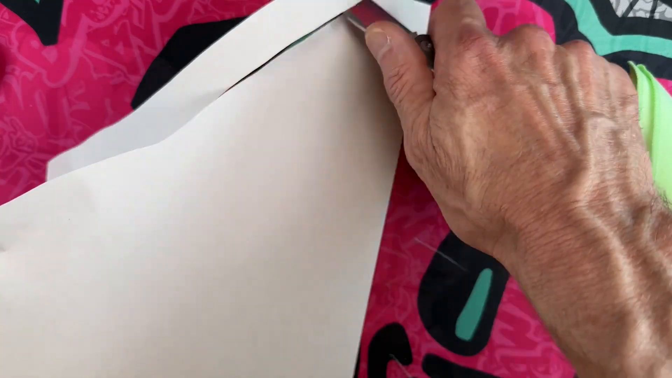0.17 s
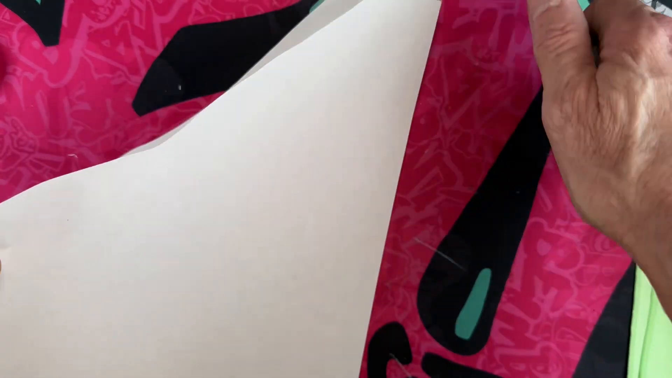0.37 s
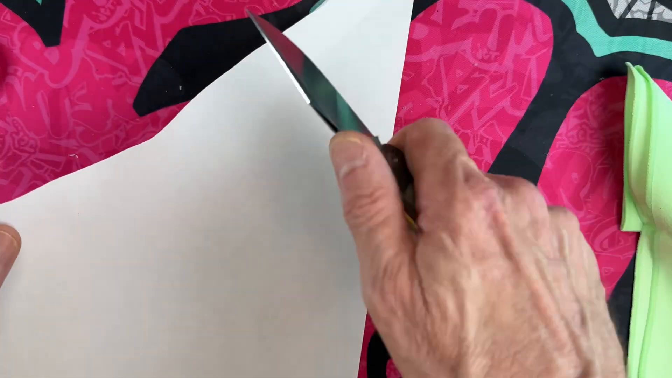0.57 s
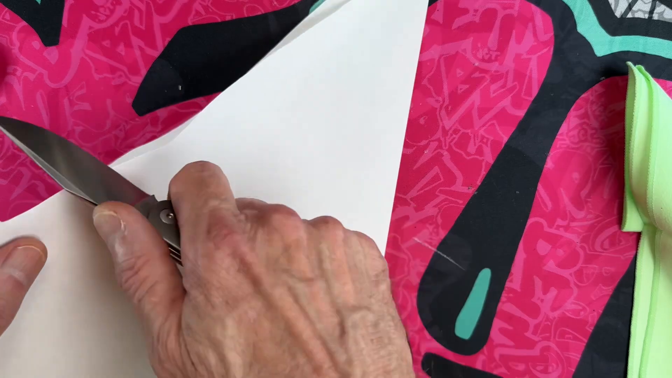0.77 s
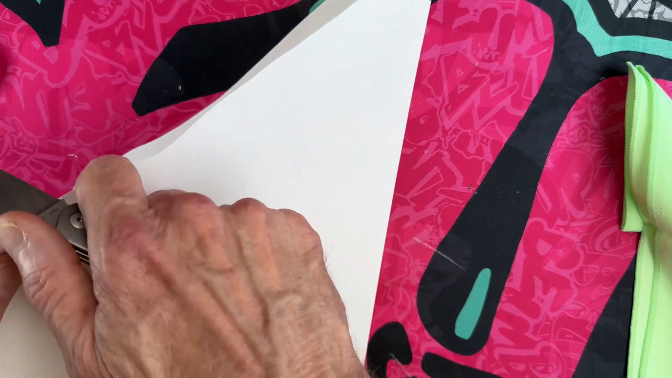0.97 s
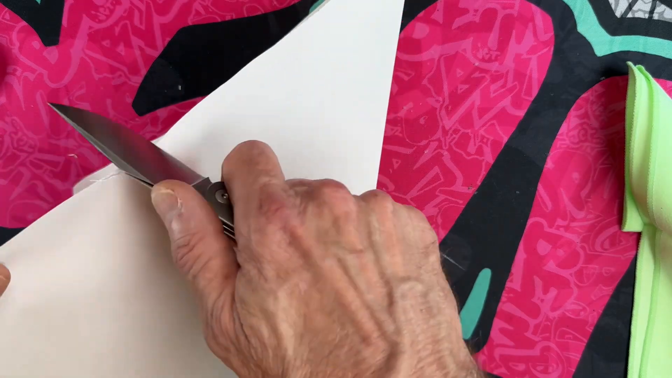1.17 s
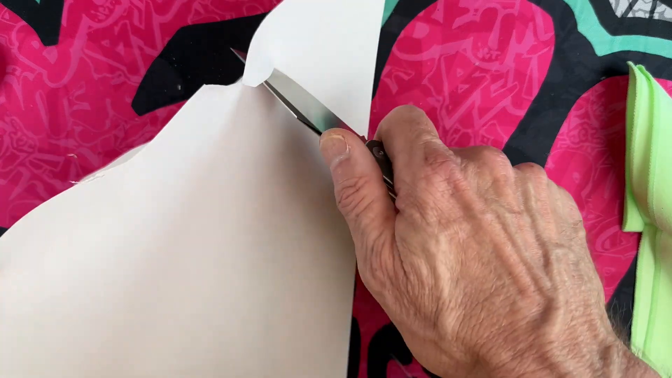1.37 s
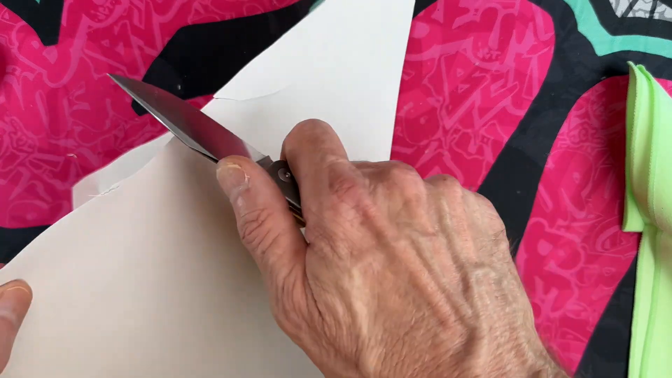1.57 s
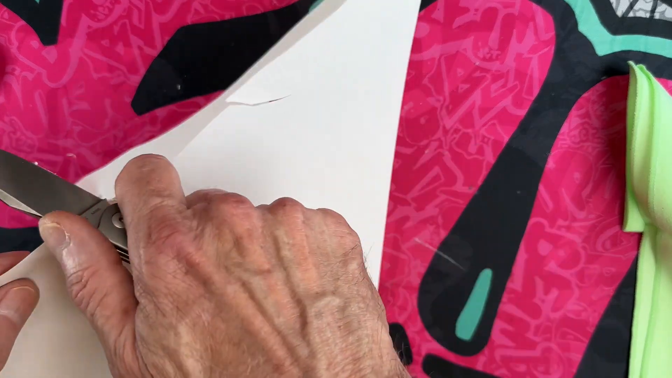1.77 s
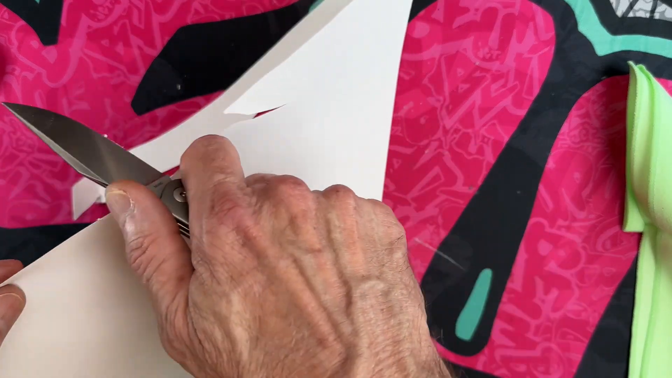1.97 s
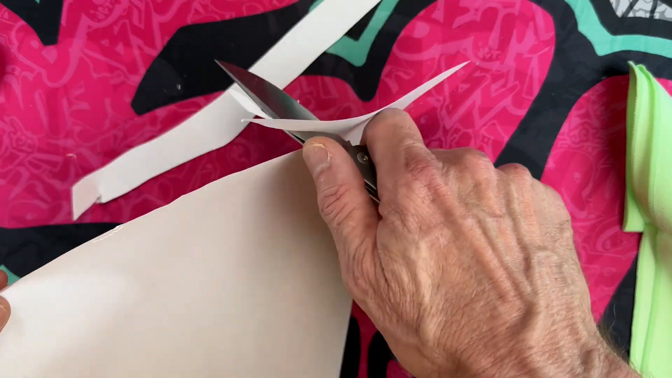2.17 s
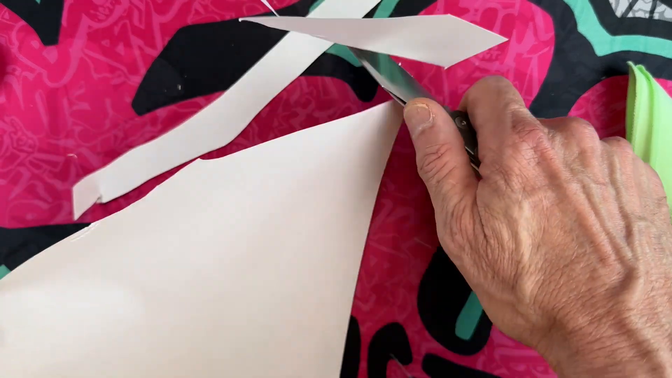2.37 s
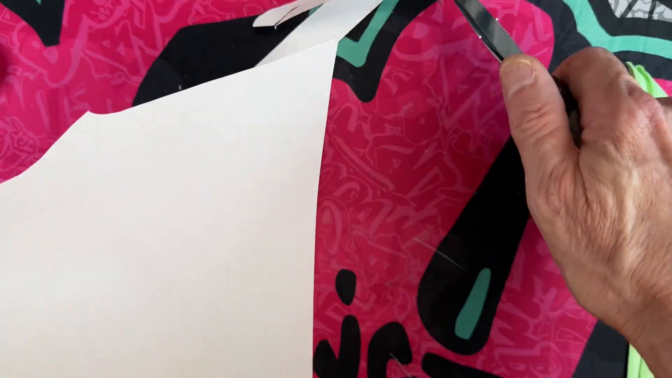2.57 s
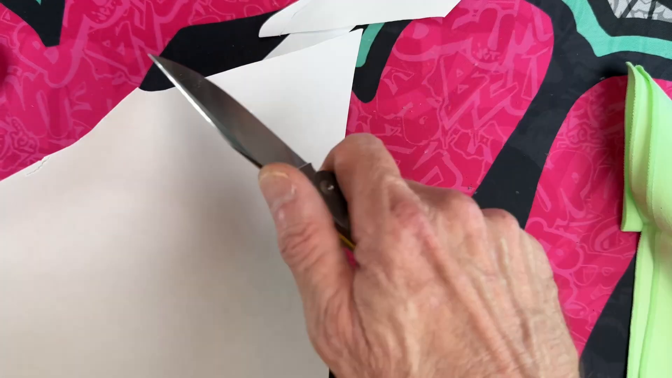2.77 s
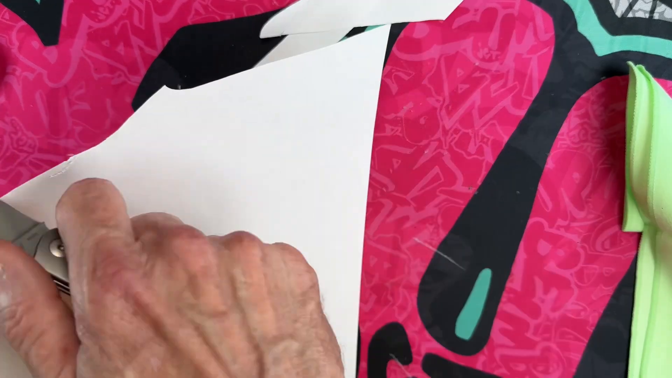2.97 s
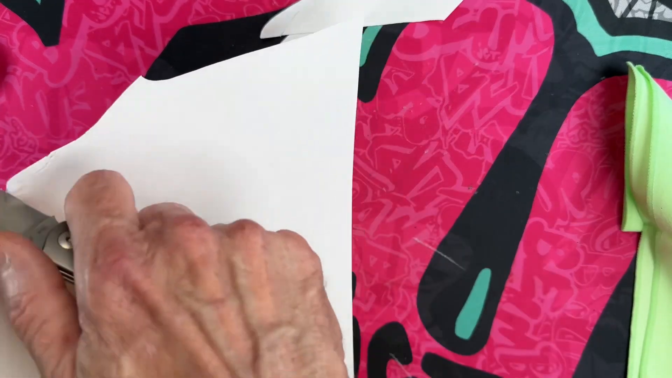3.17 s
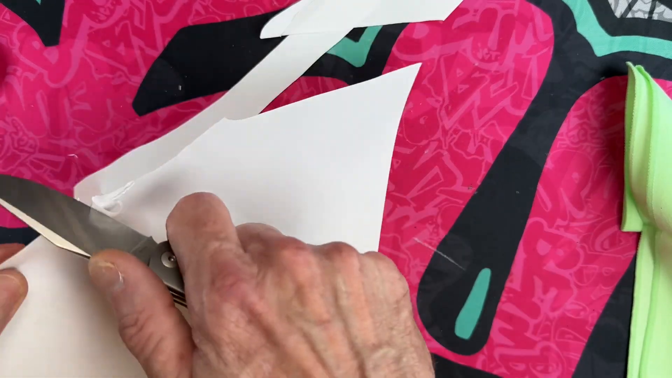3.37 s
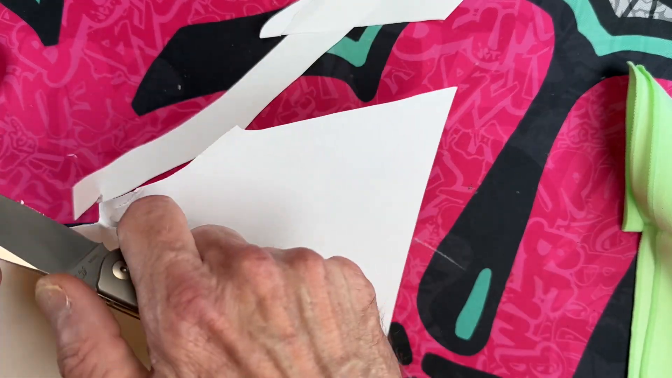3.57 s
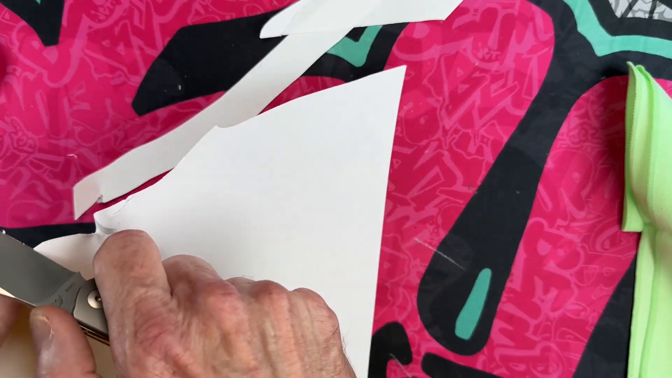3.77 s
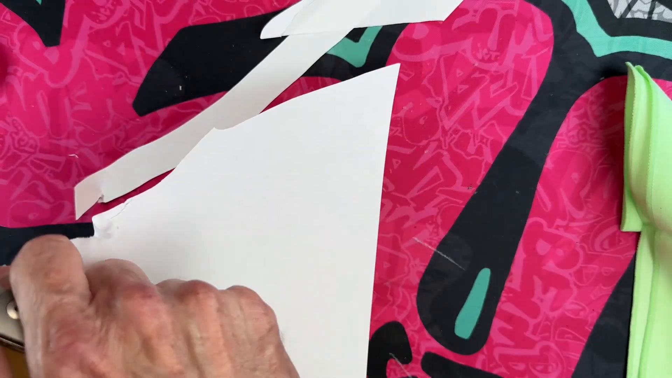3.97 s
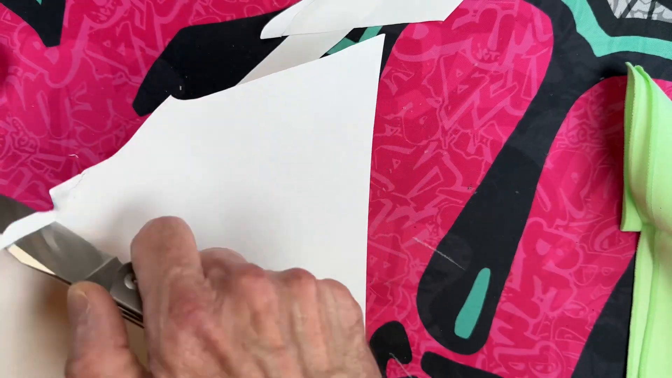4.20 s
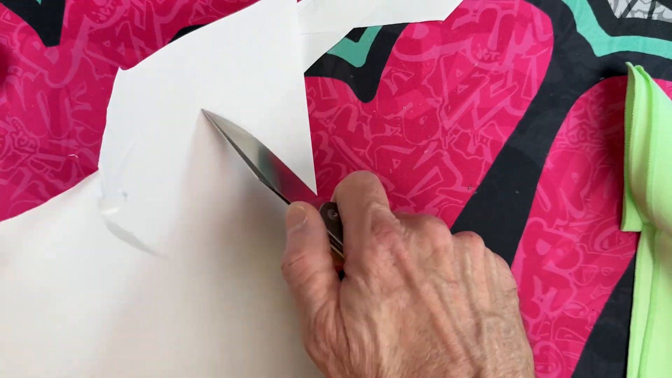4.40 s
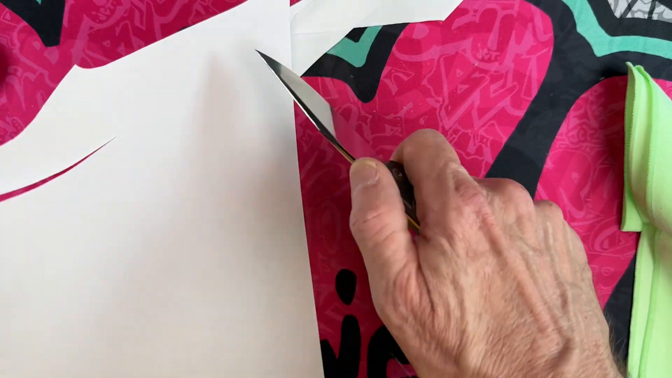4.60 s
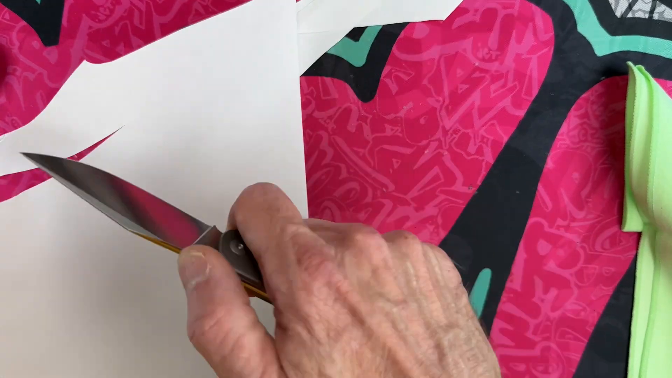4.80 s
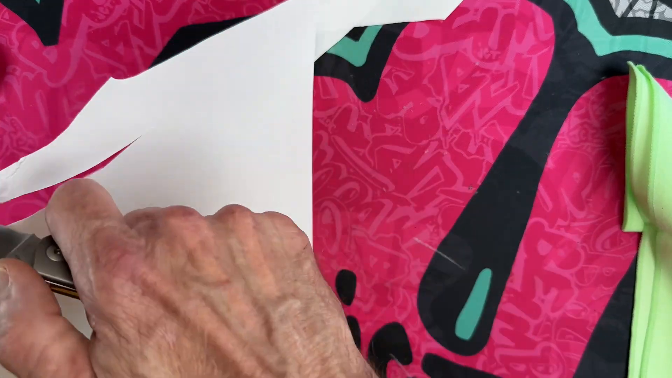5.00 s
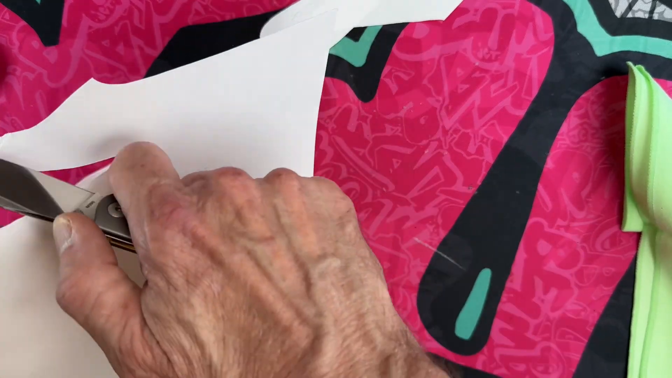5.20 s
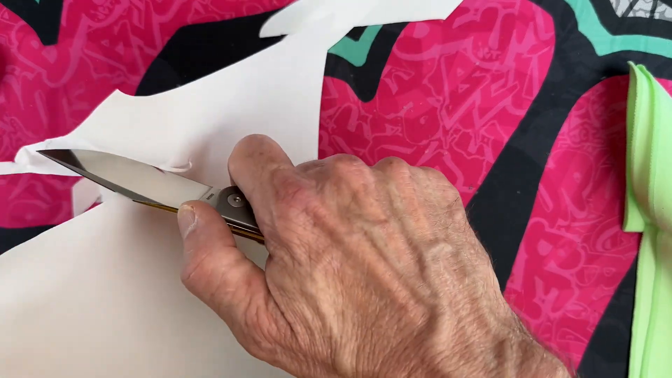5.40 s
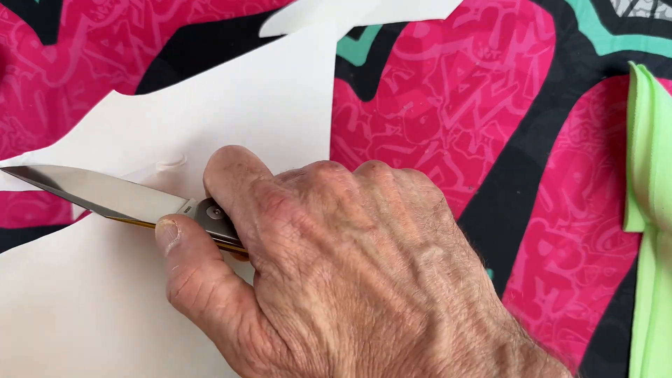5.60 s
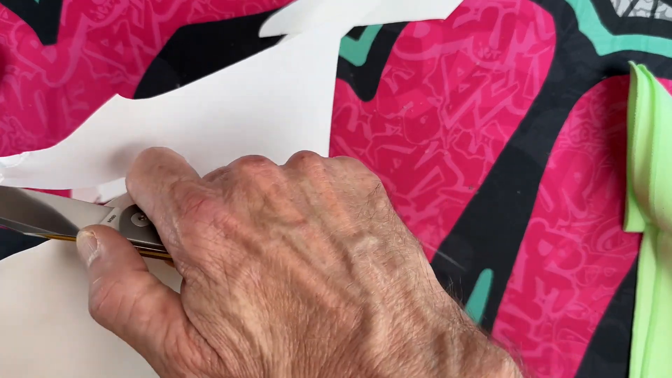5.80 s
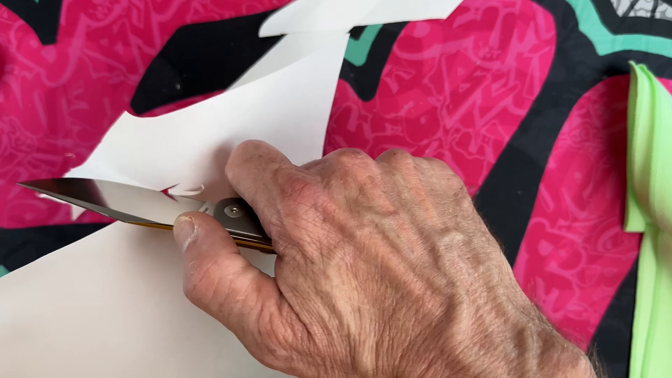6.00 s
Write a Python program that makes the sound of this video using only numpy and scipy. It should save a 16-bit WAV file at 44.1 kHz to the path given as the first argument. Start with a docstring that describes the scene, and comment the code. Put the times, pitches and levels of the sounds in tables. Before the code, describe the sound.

A sharp blade slices through a hand-held sheet of paper in seven separate raspy strokes, close up in a small, faintly humming room.

```python
"""Knife slicing paper

A sharp knife slices a hand-held sheet in seven strokes, close by, in a small room with a low hum.
Each stroke is a dense stream of tiny random snaps, the parting fibres, coloured by the free part of the sheet.
Between strokes, softer streams of snaps make the blade and loose strips brush the paper.
Ticks and flaps are short bursts of filtered noise; the hand-held sheet crackles faintly throughout.
Behind them lie room echo, soft air noise, a hum of sine tones and a low drone under two long cuts."""
import sys
import numpy as np
from scipy import signal
from scipy.fft import rfft, irfft, next_fast_len
from scipy.io import wavfile
from scipy.ndimage import uniform_filter1d, map_coordinates

SR = 44100
rng = np.random.default_rng(int(sys.argv[2]) if len(sys.argv) > 2 else 0)


def wav_record(signal):
    """Record a signal, one row per channel, as 16-bit PCM in the file named by sys.argv[1]."""
    frames = np.transpose(np.atleast_2d(signal))
    bounded = np.clip(frames, -1, 1)
    # unit amplitude maps onto the largest positive 16-bit level
    quanta = np.round(bounded * 32767).astype(np.int16)
    wavfile.write(sys.argv[1], SR, quanta)


N = 266805
TIME = np.arange(N) / SR

# Strokes of the blade; the last one snags and starts again, so it takes two rows:
# start_s, bite_s, end_s, release_s, touch_db, bite_db, swell_db (by the end),
# flutter_db and fizz_db (against the rasp, mid-stroke), late_hz, late_db (its height), early_hz
CUT_STROKES = [(0.116, 0.116, 0.215, 0.0058, -37, -28, -2, -18, -17.5, 1950, 4.5, 5870),
               (1.053, 1.161, 1.345, 0.025, -39, -30.5, -2.5, -18, -13, 2330, 1.5, 2150),
               (1.929, 1.949, 2.386, 0.007, -44, -29, -1.4, -17.5, -16.5, 4170, -1.5, 5630),
               (3.125, 3.138, 3.228, 0.017, -39.5, -37, 0.5, -12.5, -11, 1480, 4, 4200),
               (4.109, 4.138, 4.405, 0.008, -43, -35.5, 4, -17.5, -14, 2120, 5, 3850),
               (5.124, 5.241, 5.310, 0.016, -45, -37.5, 5, -11.5, -9, 1000, 13, 4000),
               (5.917, 5.96, 5.983, 0.011, -45.5, -35, 2.5, -13, -21.5, 1800, 19.5, 4260),
               (5.996, 5.997, 6.050, 0.0098, -42, -33, -18.5, -9, -18, 1600, 14, 2200)]
# Light scrapes of blade and loose strips: start_s, end_s, level_db (before a shared gain), pitch_hz
LIGHT_SCRAPES = [(0.053, 0.121, -50, 2560), (0.229, 0.415, -54.5, 4300), (0.531, 0.879, -64.5, 2800),
                 (1.481, 1.595, -53, 4430), (1.617, 1.73, -60.5, 7100), (1.862, 1.94, -56.5, 4830),
                 (2.506, 2.611, -55.5, 4500), (2.695, 2.923, -69.5, 5130), (3.244, 3.362, -45.5, 570),
                 (3.385, 3.42, -52.5, 7000), (3.46, 3.541, -54, 1880), (3.69, 3.899, -59, 2150),
                 (4.461, 4.503, -40.5, 7060), (4.526, 4.537, -42, 6750), (4.737, 4.759, -52.5, 6100),
                 (4.792, 4.803, -57, 5030), (5.325, 5.377, -47.5, 1000), (5.477, 5.554, -58.5, 5500),
                 (5.608, 5.839, -55.5, 5300), (5.905, 5.933, -53, 2000)]
# Crisp ticks of the paper's edge and creases: start_s, level_db (before fading and a shared gain), pitch_hz
CREASE_TICKS = [(0.1855, -26, 1830), (1.0231, -52, 4380), (2.4289, -26.5, 4540), (2.831, -46.5, 5000),
                (3.3333, -25.5, 2150), (3.4221, -39, 4270), (3.5079, -37.5, 1820), (3.5798, -46, 3620),
                (3.6962, -45, 3700), (3.9923, -37, 2600), (4.7386, -44.5, 5000), (5.3053, -20, 3620),
                (5.5308, -44.5, 5140)]
# Dull flaps as the sheet buckles: start_s, level_db (before fading and a shared gain), pitch_hz
SHEET_FLAPS = [(0.404, -40.5, 690), (0.975, -53, 555), (1.651, -45, 990), (1.931, -33.5, 770),
               (3.421, -39, 660), (5.130, -30.5, 2190), (5.304, -24, 610), (5.965, -21.5, 500),
               (6.001, -34, 493)]
# Tone colour of the tearing rasp: pitch_hz, relative level_db
RASP_COLOUR = [(700, -22), (1150, -15), (1700, -2.5), (2600, 0.5), (5500, 1.5), (8500, -2), (9600, -8.5),
               (11200, -37)]
# Tone colour of the sheet shaking as a whole: pitch_hz, relative level_db
FLUTTER_COLOUR = [(150, -64), (300, -12), (480, -5), (750, 1), (1050, -11), (1500, -8), (3000, -85)]
# Tone colour of the bright fizz at the edge: pitch_hz, relative level_db
FIZZ_COLOUR = [(7000, -42), (10000, -0.5), (11500, -1.5), (13500, -6.5), (15700, -15.5)]
# Tone colour of light rubbing and handling: pitch_hz, relative level_db
RUB_COLOUR = [(400, -4), (1100, -7), (2700, -2), (4500, -2), (8000, -6), (11000, -12.5), (15500, -26)]
# Treble limit shared by ticks and flaps: pitch_hz, relative level_db
BURST_TREBLE = [(6000, -5), (10000, -3.5), (15500, -45)]
# How long the room rings at each pitch: pitch_hz, t60_s (time to fall by 60 dB)
ROOM_DECAY = [(200, 0.67), (1500, 0.52), (5000, 0.34), (13000, 0.24)]
# Tone colour of the room air: pitch_hz, relative level_db
AIR_COLOUR = [(20, -2.5), (90, -3.5), (140, -5), (350, -8.5), (560, -14), (830, -14.5), (1300, -24),
              (8000, -35), (15500, -51)]
# Nearly steady hum of an appliance: pitch_hz, level_db
HUM_TONES = [(69, -77.5), (119.7, -68), (178, -76), (201.8, -62.5), (238.5, -74.5), (293, -76),
             (410, -76.5)]
# Soft low drone that swells under the two long cuts: start_s, end_s, pitch_hz, level_db
LOW_DRONE = [(1.097, 1.475, 68.6, -58), (2.04, 2.49, 68.6, -59.5)]

BITE_SHARE = 0.14  # part of a stroke that the edge takes to sink in
FLUTTER_DB_PER_S, FIZZ_DB_PER_S = 21.5, -12  # the freed strip grows: it flutters more and fizzes less
TOUCH_FLUTTER_DB, TOUCH_FIZZ_DB = 3.5, -2.5  # before the edge bites: more flutter, less fizz
EARLY_WIDTH_HZ, EARLY_DB = 290, 6.5  # resonance early in a stroke; height over the broad rasp
LATE_WIDTH_HZ = 690  # resonance late in a stroke
HANDLING_DB, HANDLING_SWING_DB = -72, 1  # the held sheet never lies quite still
ROOM_DB, AIR_DB = -13, -62
TOP_HZ = 15800  # highest pitch the recorder keeps


def cuts(attack_s=0.0042, catch_db=0.85, waver_db=1.1):
    """The edge touches, bites and leaves; parting fibres rasp, shake the whole sheet and fizz at the edge."""
    out = np.zeros(N)
    for (start, bite, end, release_s, touch_db, bite_db, swell_db,
         flutter_db, fizz_db, late_hz, late_db, early_hz) in CUT_STROKES:
        t = np.arange(start, end + 10 * release_s, 1 / SR)

        # shallow falls from 1 to 0 as the edge sinks in; travel rises from 0 to 1 from bite to end
        shallow = 1 - np.clip((t - bite) / (BITE_SHARE * (end - start)), 0, 1)
        travel = np.clip((t - bite) / (end - bite), 0, 1)
        from_middle_s = (travel - 0.5) * (end - bite)
        force_db = bite_db + (touch_db - bite_db) * shallow + swell_db * travel

        snaps = fibres(len(t), rate=9000, scatter_db=2.0)
        snaps = drifting(snaps, depth_db=3.2, size=768)
        snaps = drifting(snaps, depth_db=1.5, size=128)  # clumps of fibres part in short bright bursts

        rasp = sheet(snaps, travel, late_hz, late_db, early_hz)
        flutter_level_db = flutter_db + FLUTTER_DB_PER_S * from_middle_s + TOUCH_FLUTTER_DB * shallow
        flutter = coloured(snaps, FLUTTER_COLOUR) * amp(flutter_level_db)
        fizz_level_db = fizz_db + FIZZ_DB_PER_S * from_middle_s + TOUCH_FIZZ_DB * shallow
        fizz = coloured(snaps, FIZZ_COLOUR) * amp(fizz_level_db)

        attack = 1 - np.exp((start - t) / attack_s)
        release = np.exp(-np.maximum(t - end, 0) / release_s)  # the sheet falls still once the blade is out
        add(out, start, amp(force_db) * attack * release * (rasp + flutter + fizz))
    return out * amp(catch_db * wobble(90) + waver_db * wobble(25))  # the edge catches and runs free


def sheet(snaps, travel, late_hz, late_db, early_hz):
    """The freed strip lengthens: an early resonance gives way to a late one, lower in most strokes."""
    early = coloured(ringing(snaps, early_hz, EARLY_WIDTH_HZ, EARLY_DB), RASP_COLOUR)
    late = coloured(ringing(snaps, late_hz, LATE_WIDTH_HZ, late_db), RASP_COLOUR)
    return (1 - travel) * early + travel * late


def fibres(count, rate, scatter_db):
    """Fibres give way in tiny snaps at random moments, about rate a second, of uneven size."""
    snaps = rng.random(count) < rate / SR
    signs = np.sign(rng.standard_normal(count))
    sizes = amp(scatter_db * rng.standard_normal(count))
    return snaps * signs * sizes


def drifting(x, depth_db, size=512):
    """Peaks and dips in pitch shift with time; a short window size makes them broad and brief."""
    z = signal.stft(x, nperseg=size)[2]
    field = rng.standard_normal(z.shape)
    field = uniform_filter1d(field, size=3, axis=0)  # smooth across pitch
    field = uniform_filter1d(field, size=9, axis=1)  # smooth across time
    return signal.istft(z * amp(depth_db * unit(field)), nperseg=size)[1][:len(x)]


def slide(edge_s=0.012, width_hz=750, ring_db=5.5, gain_db=-1):
    """The flat of the blade and the loose strips brush the sheet, each time waking one resonance."""
    out = np.zeros(N)
    for start, end, db, centre_hz in LIGHT_SCRAPES:
        soft_s = edge_s * np.sqrt((end - start) / 0.2)  # longer scrapes start and stop more gently
        t = np.arange(max(start - 5 * soft_s, 0), end + 5 * soft_s, 1 / SR)
        touch = 1 / (1 + np.exp((start - t) / soft_s) + np.exp((t - end) / soft_s))
        snaps = drifting(fibres(len(t), rate=5000, scatter_db=3.5), depth_db=2.1)
        brush = coloured(ringing(snaps, centre_hz, width_hz, ring_db), RUB_COLOUR)
        add(out, t[0], amp(db + gain_db) * touch * brush)
    return out * amp(1.2 * wobble(35))


def ticks(t60_s=0.036, attack_s=0.00051, octaves=0.84, gain_db=-5.0):
    """A crease lets go with a short, crisp tick."""
    return bursts(CREASE_TICKS, t60_s, attack_s, octaves) * amp(gain_db)


def flaps(t60_s=0.11, attack_s=0.0024, octaves=0.82, gain_db=-5):
    """The sheet buckles with a low, soft pop."""
    return bursts(SHEET_FLAPS, t60_s, attack_s, octaves) * amp(gain_db)


def bursts(events, t60_s, attack_s, octaves):
    """Each sudden release rings a band of the paper's dense modes, which die quickly."""
    out = np.zeros(N)
    t = np.arange(SR // 5) / SR
    for start, db, centre_hz in events:
        band = lambda hz: np.exp(-0.5 * (np.log2((hz + 1) / centre_hz) / octaves) ** 2)
        ring = coloured(filtered(rng.standard_normal(len(t)), band), BURST_TREBLE)
        fade = amp(db - 60 * t / t60_s)
        attack = 1 - np.exp(-t / attack_s)
        add(out, start, ring * fade * attack)
    return out


def handling():
    """The sheet crackles faintly in the hand that holds it."""
    snaps = drifting(fibres(N, rate=2000, scatter_db=3), depth_db=4.5)
    rustle = coloured(snaps, RUB_COLOUR)
    return rustle * amp(HANDLING_DB + HANDLING_SWING_DB * wobble(9))


def room(x, delay_s=0.006):
    """The walls answer after a short delay; the treble dies first."""
    hz, t, z = signal.stft(rng.standard_normal(SR * 3 // 4), SR, nperseg=256)
    fade = amp(-60 * t / along(ROOM_DECAY, hz)[:, None])
    tail = signal.istft(z * fade, SR, nperseg=256)[1]
    tail = np.pad(tail / np.linalg.norm(tail), (round(delay_s * SR), 0))
    return signal.fftconvolve(x, tail)[:N]


def background(swell_s=0.17):
    """Room air is filtered noise; the hum and the passing drone are gently wavering sine tones."""
    hum = sum(amp(db) * tone(hz) for hz, db in HUM_TONES)
    drone = np.zeros(N)
    for start, end, hz, db in LOW_DRONE:
        swell = np.clip(np.minimum(TIME - start, end - TIME) / swell_s + 0.5, 0, 1)
        drone += amp(db) * swell * tone(hz)
    air = amp(AIR_DB) * coloured(rng.standard_normal(N), AIR_COLOUR)
    return hum + drone + air


def tone(hz):
    """A sine tone whose phase and level waver slowly."""
    wave = np.sin(2 * np.pi * hz * TIME + 0.2 * wobble(3))
    return np.sqrt(2) * wave * amp(0.7 * wobble(4))


def ringing(x, centre_hz, width_hz, db):
    """Let one resonance stand out over the plain sound."""
    return filtered(x, lambda hz: np.sqrt(1 + amp(db) ** 2 * peak(hz, centre_hz, width_hz)))


def peak(hz, centre_hz, width_hz):
    """Power response of one resonance: strongest at its centre, weaker to both sides."""
    return 1 / (1 + (2 * (hz - centre_hz) / width_hz) ** 2)


def coloured(x, spectrum):
    """Shape x by a tone-colour table, then bring it to rms 1."""
    return unit(filtered(x, lambda hz: amp(along(spectrum, hz))))


def filtered(x, response):
    """Make each pitch in x louder or softer by a response of frequency."""
    m = next_fast_len(len(x) + 8192)  # spare room so the end does not wrap to the start
    return irfft(rfft(x, m) * response(np.fft.rfftfreq(m, 1 / SR)), m)[:len(x)]


def along(points, hz):
    """Read a (pitch, value) table between its points on a log pitch axis."""
    f, v = np.transpose(points)
    return np.interp(np.log(hz + 1), np.log(f + 1), v)


def wobble(rate):
    """A smooth random curve, with rate random points a second."""
    return map_coordinates(rng.standard_normal(int(N * rate / SR) + 4), [TIME * rate])


def amp(db):
    """Turn decibels into a gain."""
    return 10 ** (np.asarray(db) / 20)


def unit(x):
    """Scale to rms (average strength) 1."""
    return x / np.sqrt(np.mean(x ** 2) + 1e-20)


def add(track, start_s, sound):
    """Mix a sound into a track at a start time."""
    part = track[max(round(start_s * SR), 0):][:len(sound)]
    part += sound[:len(part)]


def scene():
    """Paper and knife close by, the room around them."""
    paper = cuts() + slide() + ticks() + flaps() + handling()
    return (paper + amp(ROOM_DB) * room(paper) + background())[None]


def record(dry):
    """The recorder keeps nothing above its band limit."""
    return np.array([filtered(channel, lambda hz: hz < TOP_HZ) for channel in dry])


dry = scene()
out = record(dry)
wav_record(out)
```